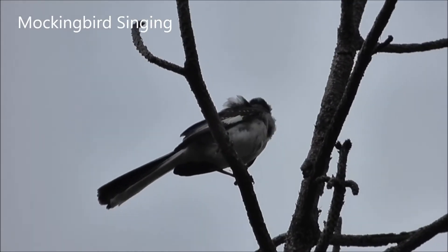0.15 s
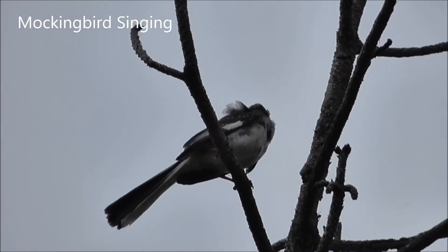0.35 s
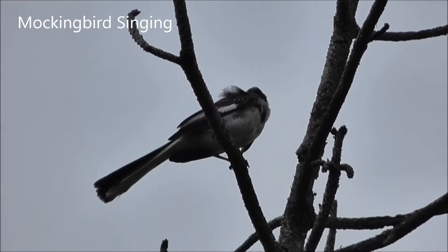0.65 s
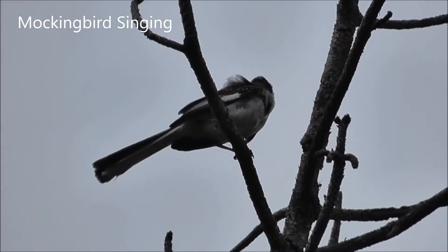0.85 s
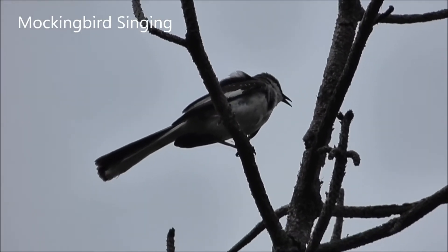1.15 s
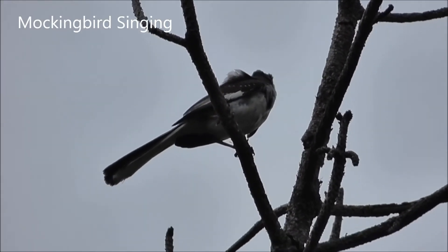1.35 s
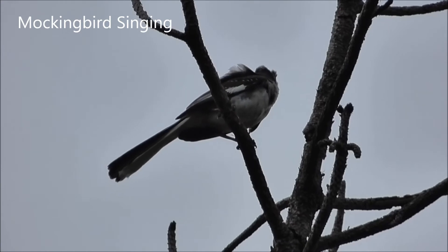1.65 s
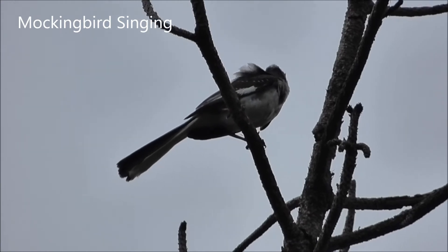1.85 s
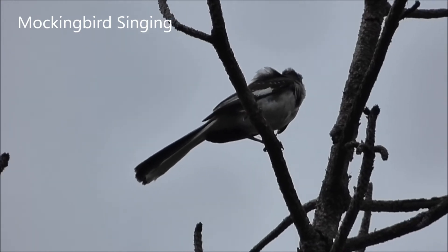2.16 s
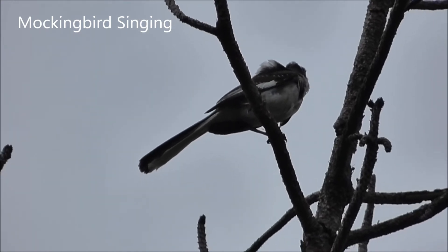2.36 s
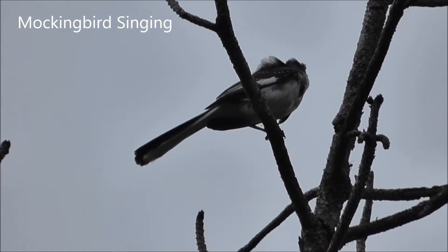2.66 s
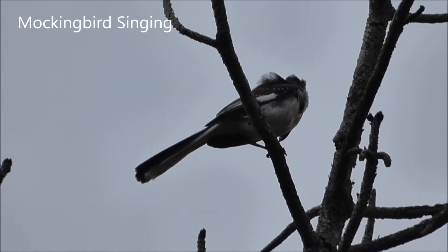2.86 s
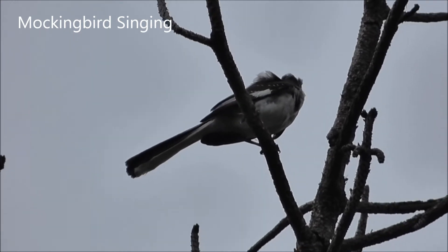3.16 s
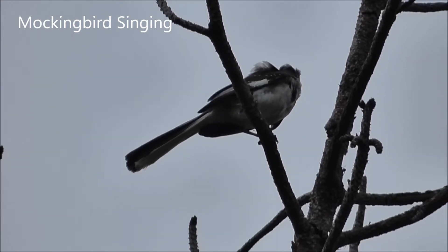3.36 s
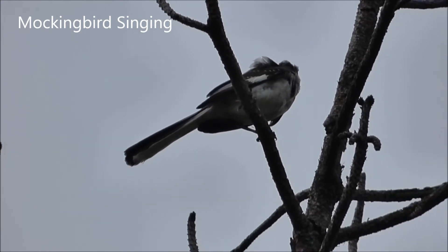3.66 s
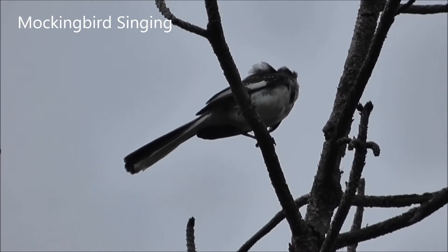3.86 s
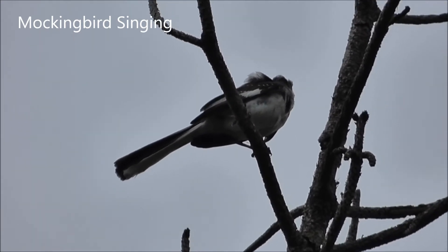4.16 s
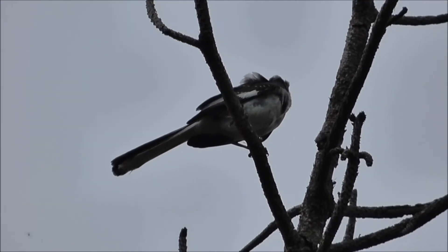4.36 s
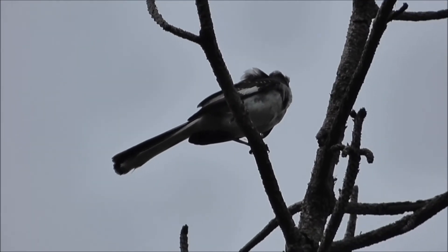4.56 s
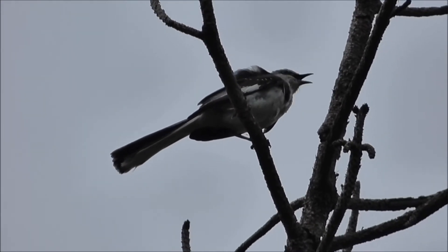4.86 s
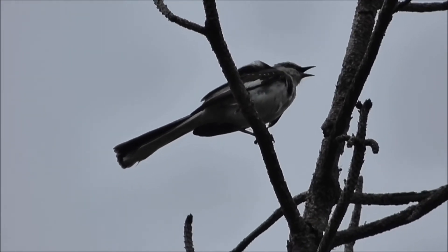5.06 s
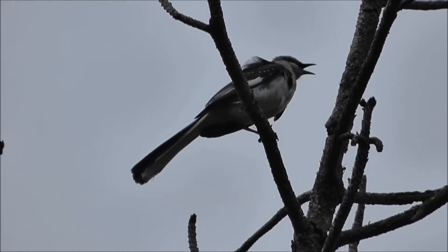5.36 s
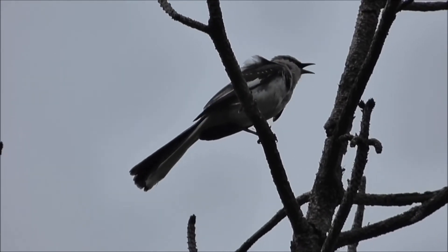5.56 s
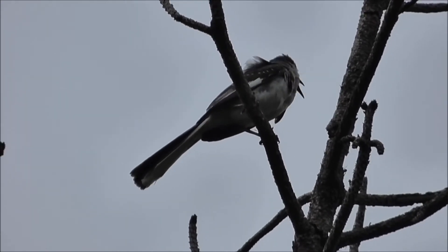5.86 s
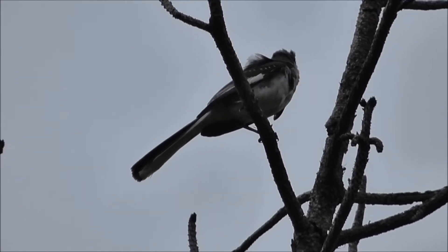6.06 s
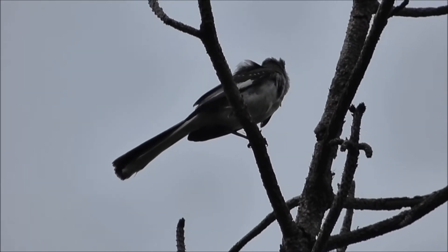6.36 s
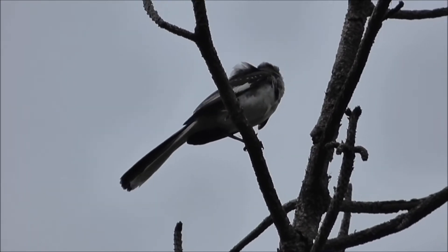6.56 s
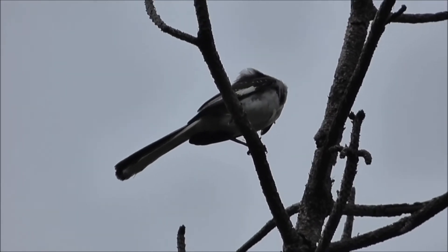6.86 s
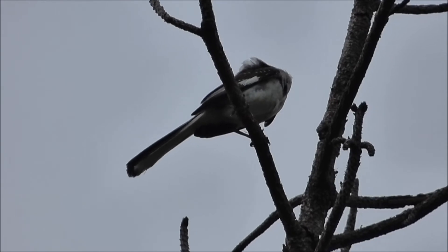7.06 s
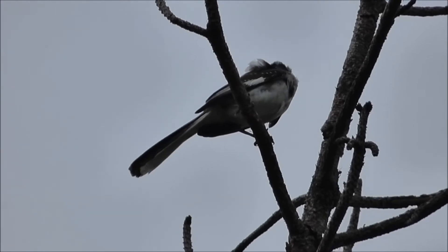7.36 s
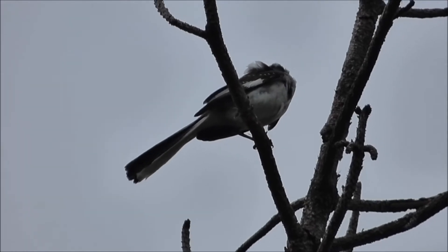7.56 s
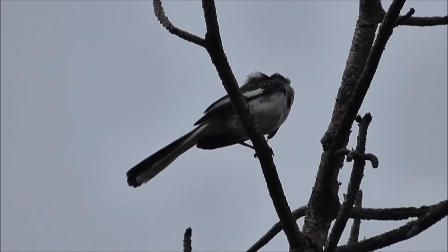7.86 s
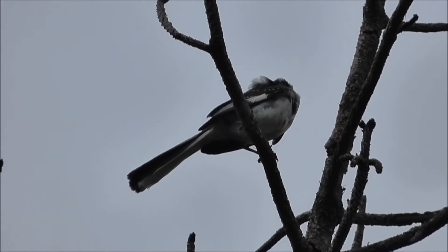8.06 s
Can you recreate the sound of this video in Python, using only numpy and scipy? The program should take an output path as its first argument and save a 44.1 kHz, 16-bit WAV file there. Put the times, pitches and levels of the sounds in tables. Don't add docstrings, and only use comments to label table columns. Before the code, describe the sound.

Quick swelling chirps from a nearby bird lead into a chain of rapid high warbles, about eight a second. Then come softer upward hooks, a strong arched whistle, three long falling whistles, and three isolated quick rises with pauses between. The stereo outdoor sound has light reflections from branches and walls, a quiet constant hum and insect haze, and a few barely heard distant calls.

```python
import sys
import numpy as np
from scipy import signal
from scipy.io import wavfile
from scipy.ndimage import uniform_filter1d

SR = 44100
rng = np.random.default_rng(int(sys.argv[2]) if len(sys.argv) > 2 else 0)


def boost(x):
    u = np.asarray(x, float) / 20
    return 10 ** u


def file_out(sig):
    cols = np.atleast_2d(sig).T
    lim = np.clip(cols, -1, 1)
    pcm = np.round(lim * 32767).astype(np.int16)
    wavfile.write(sys.argv[1], SR, pcm)


N = 362061
LEAD = SR // 4
WAVER_HZ = 40

# (first crest [s], level [dB], warble rate [1/s], crest [Hz], trough [Hz])
TRILLS = [(1.3717, -23, 98, 6240, 4340), (1.485, -20, 98, 6450, 4543), (1.6049, -21.4, 83, 6420, 4780),
          (1.721, -24.5, 114, 6460, 5044), (1.847, -22.5, 93, 6380, 4780), (1.969, -21, 101, 6375, 4850),
          (2.104, -23, 99, 6350, 4784), (2.236, -24, 89, 6390, 4770), (2.372, -23.5, 99, 6390, 4904),
          (2.511, -22.5, 76, 6450, 4960), (2.641, -23.5, 86, 6180, 4707), (2.779, -23.5, 87, 6160, 4716),
          (2.928, -24.5, 96, 5994, 4550), (3.059, -25.5, 92, 6040, 4560)]
FIRST_TRILL_S = TRILLS[0][0]
# (pitch [Hz], level [dB])
OVERTONE = [(3800, -32.5), (4200, -27.5), (5000, -30.5), (5400, -28), (5900, -27.5), (6400, -30),
            (6800, -12)]


def evened(x):
    return x / np.sqrt(np.mean(x ** 2) + 1e-20)


def drift(length, size):
    return evened(uniform_filter1d(rng.standard_normal(length), size=size))


def read(points, hz):
    f, value = np.transpose(points)
    return np.interp(np.log(hz + 1), np.log(f + 1), value)


def add(mix, s, sound):
    part = mix[LEAD + round(s * SR):][:len(sound)]
    part += sound[:len(part)]


def syrinx(hz, db, over_db, third_db, fade=0.0039):
    # (frequency [Hz], gain [dB])
    beak = [(2500, -12), (4500, 36), (6500, -7), (8000, 12.5), (10000, 3.5), (12000, 0.5), (14000, -7),
            (16000, -14.5)]
    turn = 2 * np.pi * np.cumsum(hz) / SR
    tone = np.sin(turn)
    for partial, part_db in ((2, over_db), (3, over_db + third_db)):
        high_hz = partial * hz
        flicker_db = 3.5 * drift(len(hz), 250)
        level = boost(part_db + flicker_db + read(beak, high_hz))
        tone += level * np.sin(partial * turn) * (high_hz < SR / 2)
    n = np.arange(len(hz))
    edges = np.clip(np.minimum(n, n[::-1]) / (fade * SR), 0, 1)
    return np.sqrt(2) * boost(db) * tone * edges


def chirp(s, db, start_hz, end_hz, crest_hz):
    glide = .039
    u = np.arange(-glide, .02, 1 / SR)
    rise = np.minimum(1 + u / glide, 1)
    warble = (u > -.006) * (1.2 * np.cos(np.pi * 84 * u) ** 4 - .2)
    hz = start_hz + (end_hz - start_hz) * rise + (crest_hz + 60 - end_hz) * warble
    swell_db = -24 * (1 - rise) ** 3.8 - 300 * np.maximum(u, 0) - 5 * warble
    over_db = -19.5 - 2.2 * (4.5 - rise)
    return s - glide, syrinx(hz, db + swell_db, over_db, third_db=6 - 4.0 * warble)


def trill(s, db, rate, crest_hz, trough_hz):
    length = .071 - 0.0232 * np.exp((FIRST_TRILL_S - s) / 0.232)
    u = np.arange(-.009, .12, 1 / SR)
    wander = uniform_filter1d(rng.standard_normal((len(u), 2)), size=200, axis=0)
    waver = evened(wander)[u < length].T
    u = u[u < length]
    after = np.maximum(u, 0)
    share = after / length
    top_hz = crest_hz - 500 * np.exp(-after / .02)
    dip = (1 - .75 * share ** 1.5) * np.sin(np.pi * rate * after * (1 - 1.8 * after)) ** 2
    flick = (-np.minimum(u, 0) / .009) ** 1.5
    flick_hz = 3500 * (1 - 0.3 * (s == FIRST_TRILL_S))
    hz = top_hz - (top_hz - trough_hz) * dip - flick_hz * flick + WAVER_HZ * waver[0]
    off_tune = (hz - trough_hz - 150) / 1000
    sharp = np.maximum(off_tune, 0)
    throat_db = 3.0 - 7 * sharp + np.clip(40 * off_tune + 4, -22, 0)
    shape_db = throat_db + 4 * share - 6 * share ** 4 - 2.5 * np.exp(-after / 0.008)
    over_db = -26.0 + 22 * flick + 6.8 * sharp - 5 * share
    level_db = db + shape_db + 1.5 * waver[1]
    return s + u[0], syrinx(hz, level_db, over_db, third_db=2.5 - 28 * flick, fade=0.00087)


def bend(t, s, value):
    step = np.diff(value) / np.diff(s)
    product = step[1:] * step[:-1]
    inner = np.where(product > 0, 2 * product / (step[1:] + step[:-1] + 1e-9), 0)
    slope = np.r_[step[0], inner, step[-1]]
    k = np.clip(np.searchsorted(s, t) - 1, 0, len(s) - 2)
    span = np.diff(s)[k]
    u = (t - s[k]) / span
    curve = (1 - u) * (slope[k] - step[k]) - u * (slope[k + 1] - step[k])
    return value[k] + span * u * (step[k] + (1 - u) * curve)


def whistle(s, hz, db):
    t = np.arange(s[0], s[-1], 1 / SR)
    hz, db = bend(t, s, hz), bend(t, s, db)
    over_db = read(OVERTONE, hz) + 0.98 * np.clip(-25.5 - db, 0, 13)
    third_db = 5.5 - 3.3 * np.clip(hz / 1000 - 4.4, 0, 1)
    return s[0], syrinx(hz, db, over_db, third_db)


def hook(s, length, db, held_hz, top_hz):
    # (share of length [0-1], share of climb [0-1], level [dB])
    course = [(0, -0.3, -12.5), (.12, 0, -1), (.45, .07, 2.5), (.7, .48, 0.5), (.9, 0.88, -2.5),
              (1, 0.96, -18)]
    u, climb, edge_db = np.transpose(course)
    peak_db = -23
    swell_db = (peak_db - db) * np.clip(2 * climb, 0, 1)
    return whistle(s + u * length, held_hz + (top_hz - held_hz) * climb, db + edge_db + swell_db)


def fall(s, length, db, haste, open_db):
    # (share of length [0-1], pitch [Hz], level [dB])
    course = [(0, 6350, -22), (.05, 6810, 0), (.2, 5850, -1), (.27, 5530, -3), (.47, 5070, -3),
              (.77, 4160, 1), (.93, 3830, -5), (1, 3750, -9)]
    u, hz, shape_db = np.transpose(course)
    t = u ** (1 / haste) * length
    opening_db = open_db * np.exp(-(t / .04) ** 2)
    return whistle(s + t, hz, db + shape_db + opening_db)


def sweep(s, length, db, top_hz):
    # (share of length [0-1], share of climb [0-1], level [dB])
    course = [(0, 0.029, -23), (0.142, 0.18, -8.5), (0.349, .41, 1.5), (0.698, .76, -2.5), (.9, .95, -7),
              (1, 0.91, -7)]
    u, climb, shape_db = np.transpose(course)
    from_hz = 4586
    return whistle(s + u * length, from_hz + (top_hz - from_hz) * climb, db + shape_db)


def catch(s, length, start_hz, end_hz, db):
    hz = np.linspace(start_hz, end_hz, round(length * SR))
    return s, syrinx(hz, db, read(OVERTONE, hz), third_db=-13, fade=length / 2)


def singer():
    # (first crest [s], level [dB], start [Hz], glide end [Hz], crest [Hz])
    chirps = [
        (-.095, -22, 3850, 4364, 4970),
        (0.017, -26.5, 3850, 4250, 4950),
        (0.137, -26.5, 3846, 4265, 4860),
        (0.736, -26, 3917, 4395, 4950),
        (0.842, -23, 3866, 4345, 4950),
        (0.952, -23, 3840, 4365, 4875),
        (1.061, -23, 3860, 4466, 5080),
        (1.169, -21, 3926, 4400, 4950),
        (1.282, -21.5, 3886, 4364, 4915),
    ]
    # (start [s], length [s], held level [dB], held pitch [Hz], top [Hz])
    hooks = [
        (4.349, 0.11, -37, 4845, 6280),
        (4.523, .123, -27, 4850, 6035),
        (4.708, 0.12, -27, 4970, 6120),
    ]
    # (time [s], pitch [Hz], level [dB])
    climb = [(4.897, 4370, -37), (4.911, 4780, -26), (4.951, 4980, -22.5), (4.979, 5214, -17.5),
             (5.01, 5660, -23), (5.035, 6080, -41)]
    # (time [s], pitch [Hz], level [dB])
    arch = [(5.111, 4470, -29), (5.124, 5056, -23.5), (5.152, 4910, -22.5), (5.199, 5095, -16.5),
            (5.24, 5095, -18.5), (5.275, 4800, -14), (5.31, 4393, -20), (5.345, 4156, -16.5),
            (5.365, 4235, -33)]
    # (start [s], length [s], level [dB], haste [ratio], opening [dB])
    falls = [
        (5.481, .29, -19, 1.05, -1),
        (5.87, .3, -21.5, .99, 0.5),
        (6.321, .334, -23.5, .91, -22),
    ]
    # (start [s], length [s], level [dB], top [Hz])
    sweeps = [
        (6.873, 0.081, -18.5, 6530),
        (7.317, .09, -21.5, 6590),
        (7.847, 0.09, -18.5, 6600),
    ]
    # (start [s], length [s], start [Hz], end [Hz], level [dB])
    catches = [(1.352, 0.021, 3665, 4630, -21.5), (4.816, 0.0089, 6100, 6680, -36),
               (5.363, 0.011, 4570, 3670, -23.5), (5.471, .01, 7400, 6670, -33),
               (5.478, 0.021, 9570, 10600, -46), (5.773, 0.0078, 4075, 3720, -20.5),
               (5.862, 0.017, 8080, 6130, -38), (6.169, 0.016, 4040, 3860, -22.5),
               (6.33, 0.0041, 7000, 6340, -43), (6.635, 0.0235, 3950, 3750, -20.5),
               (6.87, 0.0085, 5570, 4970, -43), (7.314, .008, 5080, 4620, -46),
               (7.842, 0.011, 5570, 4700, -54)]
    away, song = np.zeros((2, LEAD + N))
    for row in chirps:
        add(away, *chirp(*row))
    for make, rows in ((trill, TRILLS), (hook, hooks), (fall, falls), (sweep, sweeps), (catch, catches)):
        for row in rows:
            add(song, *make(*row))
    for points in (climb, arch):
        add(song, *whistle(*np.transpose(points)))
    wall = boost(-9) * uniform_filter1d(np.roll(away, round(.035 * SR)), size=4)
    return song + away + wall


def branches(x):
    # (delay [s], level [dB], left-right tilt [dB])
    echoes = [(.005, -14.5, 2), (.009, -9.5, 1.5), (.014, -19, -6), (0.018, -25.5, 17), (0.044, -16, 0),
              (0.063, -24.5, -7)]
    out = np.tile(x[LEAD:], (2, 1))
    for delay, db, pan_db in echoes:
        out += boost(db + np.array([[pan_db], [-pan_db]])) * x[LEAD - round(delay * SR):][:N]
    return out


def yard(x, tail_db, start, alike):
    # (frequency [Hz], t60 [s])
    decay = [(2000, 0.71), (4000, 0.62), (6000, .42), (9000, 0.52), (14000, 0.35)]
    # (frequency [Hz], gain [dB])
    colour = [(2000, 2.5), (4200, -0.5), (6000, 2.5), (9000, -3), (12000, -1), (15000, 0.5)]
    a, b = rng.standard_normal((2, SR // 2))
    taps = np.array([alike * a + (1 - alike) * b, alike * a - (1 - alike) * b])
    hz, t, z = signal.stft(taps, SR, nperseg=128)
    dying_db = read(colour, hz)[:, None] - 60 * t / read(decay, hz)[:, None]
    tail = signal.istft(z * boost(dying_db), SR, nperseg=128)[1]
    tail *= np.clip(np.arange(tail.shape[1]) / (start * SR), 0, 1)
    wet = signal.fftconvolve(x[None], tail / np.linalg.norm(tail[0]), axes=1)
    return boost(tail_db) * wet[:, LEAD:LEAD + N]


def far_note(s, length, start_hz, end_hz, db):
    hz = np.linspace(start_hz, end_hz, round(length * SR))
    hz = hz + WAVER_HZ * drift(len(hz), 500)
    return s, syrinx(hz, db, over_db=-45, third_db=0, fade=.02)


def scold(s, length, db, attack, fade_db):
    t = np.arange(0, length, 1 / SR)
    rasp = uniform_filter1d(rng.standard_normal(len(t)), size=34)
    turn = 2 * np.pi * np.cumsum(np.linspace(4550, 3500, len(t))) / SR
    return s, np.minimum(t / attack, 1) * boost(db + fade_db * t / length) * evened(rasp * np.sin(turn))


def far_birds():
    # (start [s], length [s], start [Hz], end [Hz], level [dB])
    calls = [
        (2.252, .09, 2200, 2050, -79),
        (3.079, 0.1, 2450, 2400, -70.5),
        (3.2, 0.086, 2420, 2650, -78),
        (3.314, 0.12, 2485, 2365, -69),
        (3.452, .1, 2400, 2380, -83),
        (4.094, .08, 2790, 2620, -81),
        (4.624, .085, 2140, 2620, -74),
        (7.414, .09, 2050, 2350, -78.5),
    ]
    # (start [s], length [s], level [dB], attack [s], fade [dB])
    rasp = (3.67, .19, -66, .04, -8)
    far = np.zeros(LEAD + N)
    for row in calls:
        add(far, *far_note(*row))
    far *= boost(3 * drift(len(far), 500))
    add(far, *scold(*rasp))
    return far


def air():
    # (frequency [Hz], density [dB per Hz])
    wash = [(8.8, -82), (15, -25), (153, -17.5), (335, -3.5), (388, -7.5), (549, -6.5), (600, -6),
            (1100, -6.5), (1200, -6), (1520, -14), (3050, -18.5), (4080, -19.5), (4850, -17), (8670, -26.5),
            (15500, -37)]
    # (centre [Hz], width [Hz], height [dB])
    bumps = [(121, 25, -1), (276, 21, 3), (343.1, 15.2, 10.5), (386.5, 20.6, -20.5), (592, 13.3, 8.5),
             (853, 110, 10), (1224, 62, 10), (1766, 44, 3), (4950, 400, 0.5), (8940, 820, 11)]
    # (frequency [Hz], correlation [-1 to 1])
    likeness = [(60, 0.7), (92, 0.81), (140, 0.87), (210, 0.97), (330, 0.97), (500, 0.8), (770, 0.7),
                (1170, 0.75), (1790, 0.59), (2740, 0.87), (4190, 0.93), (6410, 0.81), (9810, 0.8),
                (15000, 0.53)]
    # (frequency [Hz], phase [rad])
    port_lead = [(300, 0), (690, .1), (850, -3), (1030, -5.3), (1290, -6.28), (2000, -6.28)]
    # (frequency [Hz], left minus right [dB])
    lean = [(60, 2), (110, -2.5), (200, 0.5), (380, -3), (700, -1), (1290, -1.5), (2380, 0.5), (4400, -1),
            (8120, -0.5), (15000, -0.5)]
    frames, hz = N // 1024 + 5, np.fft.rfftfreq(4096, 1 / SR)
    a, b, c, d, patches = rng.standard_normal((frames, len(hz), 5)).T
    patches = evened(uniform_filter1d(uniform_filter1d(patches, size=12, axis=0), size=5, axis=1))
    colour_db = read(wash, hz)
    for f, width, db in bumps:
        colour_db = colour_db + db / (1 + (2 * (hz - f) / width) ** 2)
    same = np.clip(read(likeness, hz), -1, 1)[:, None]
    mid = a + 1j * b
    left = mid * np.exp(1j * read(port_lead, hz))[:, None]
    right = same * mid + np.sqrt(1 - same ** 2) * (c + 1j * d)
    lean_db = np.array([.5, -.5])[:, None, None] * read(lean, hz)[:, None]
    z = np.array([left, right]) * boost(colour_db[:, None] + 1.3 * patches + lean_db)
    return boost(-44) * evened(signal.istft(z, nperseg=4096, noverlap=3072)[1][:, :N])


def scene():
    song, far = singer(), far_birds()
    near = branches(song) + yard(song, tail_db=-7.0, start=.014, alike=.84)
    distant = boost(17.5) * far[LEAD:] + yard(far, tail_db=0, start=.01, alike=0.56)
    return near + distant + air()


def thinned(x, under_db, quiet_db):
    # (frequency [Hz], threshold offset [dB])
    readiness = [(6300, 13), (7500, 12.5), (8100, 10), (8600, -9), (10500, 11), (12000, 5), (13500, -11),
                 (14500, 16), (15500, 4)]
    hz, t, z = signal.stft(x, SR, nperseg=2048, noverlap=1024)
    power = (abs(z) ** 2).mean(0)
    bands = power[:-1].reshape(32, 32, -1).mean(1)
    band_db = 10 * np.log10(np.repeat(bands, 32, axis=0) + 1e-20)
    limit_db = np.maximum(10 * np.log10(power.sum(0)) - under_db, quiet_db)
    bin_hz = hz[:-1, None]
    keep = np.clip((band_db - limit_db - read(readiness, bin_hz)) / 2, 0, 1)
    z[:, :-1] *= np.where(bin_hz > 6250, keep, 1)
    return signal.istft(z, SR, nperseg=2048, noverlap=1024)[1][:, :N]


def top_cut(x):
    return signal.sosfilt(signal.butter(12, 15720, fs=SR, output="sos"), x)


def record(dry):
    power_db = 10 * np.log10(abs(uniform_filter1d((dry ** 2).mean(0), size=2000)) + 1e-12)
    recovery_db = np.arange(N) * 4.0 / SR
    held_db = np.maximum.accumulate(power_db + recovery_db) - recovery_db
    over_db = np.maximum(held_db + 18.5, 0)
    eased = dry / boost(0.41 * uniform_filter1d(over_db, size=2000))
    return top_cut(thinned(eased, under_db=73.0, quiet_db=-104))


dry = scene()
out = record(dry)
file_out(out)
```